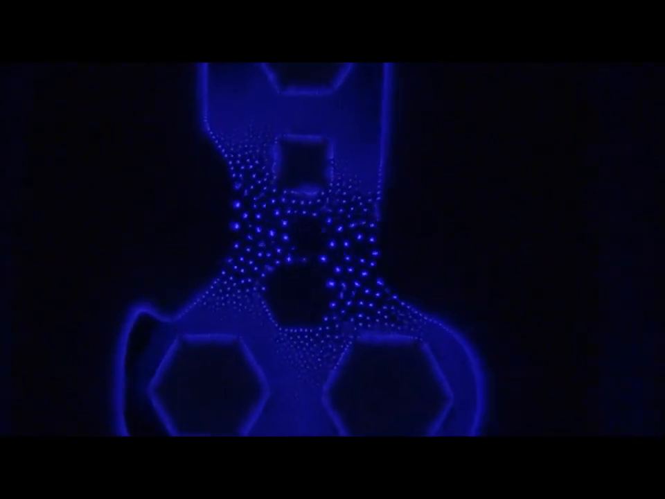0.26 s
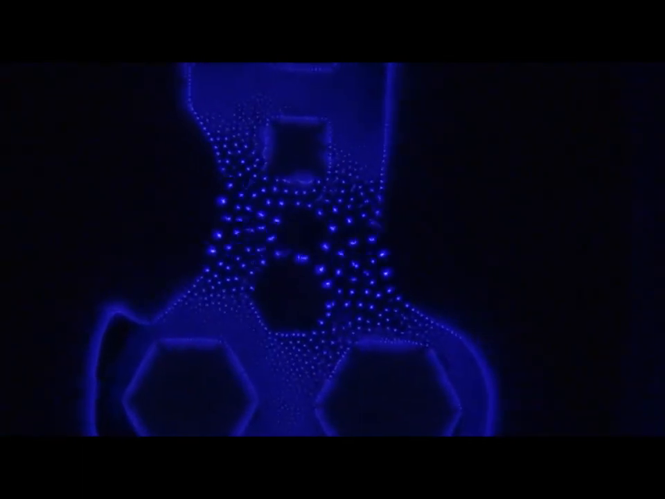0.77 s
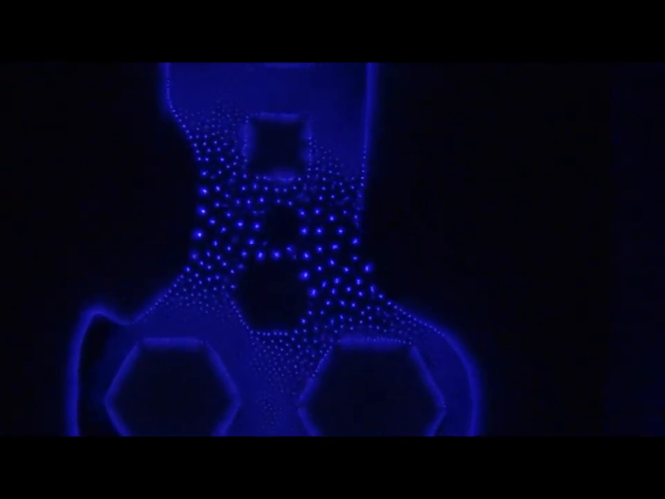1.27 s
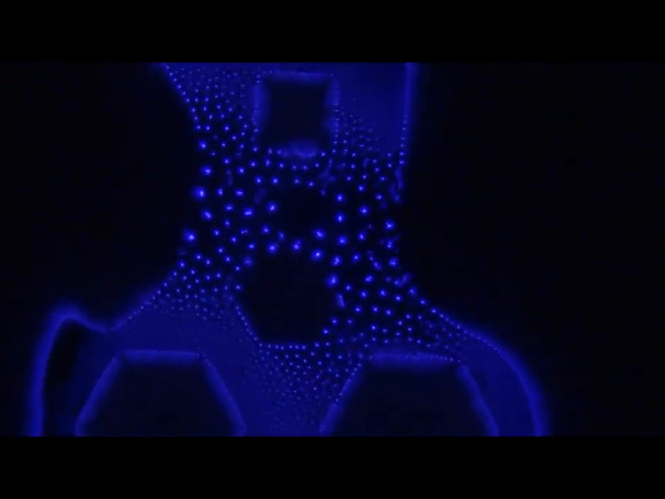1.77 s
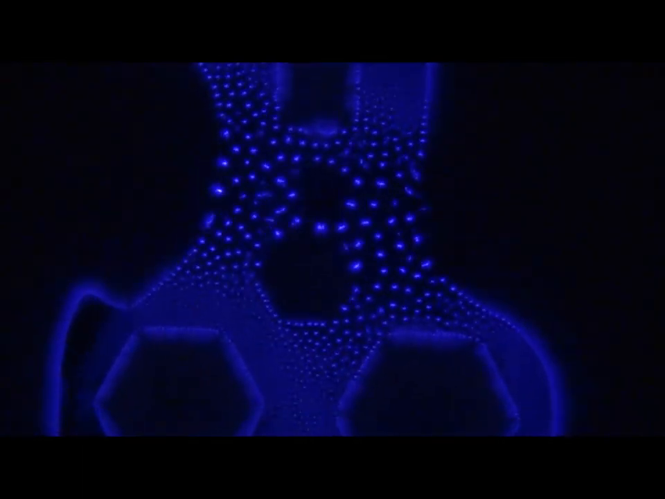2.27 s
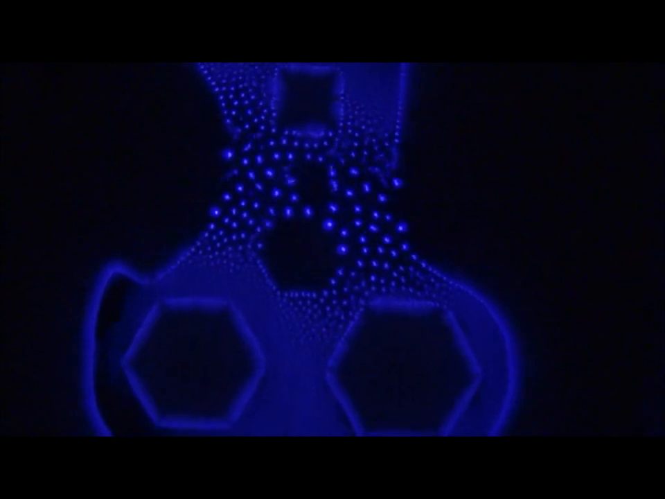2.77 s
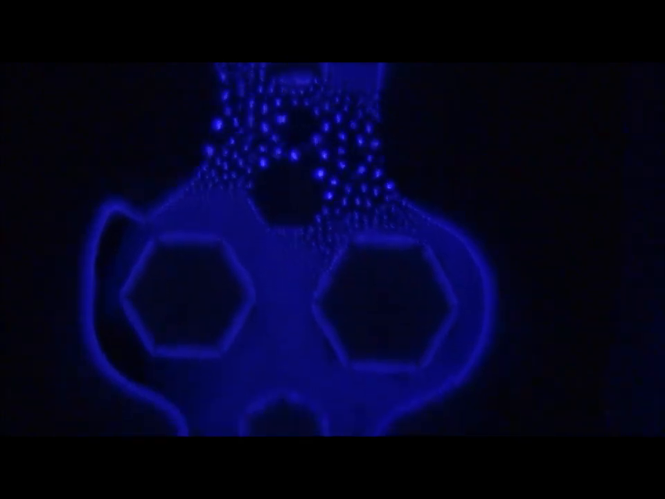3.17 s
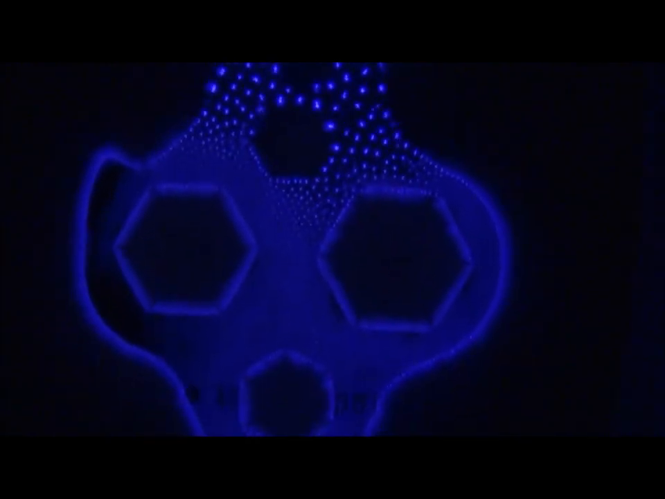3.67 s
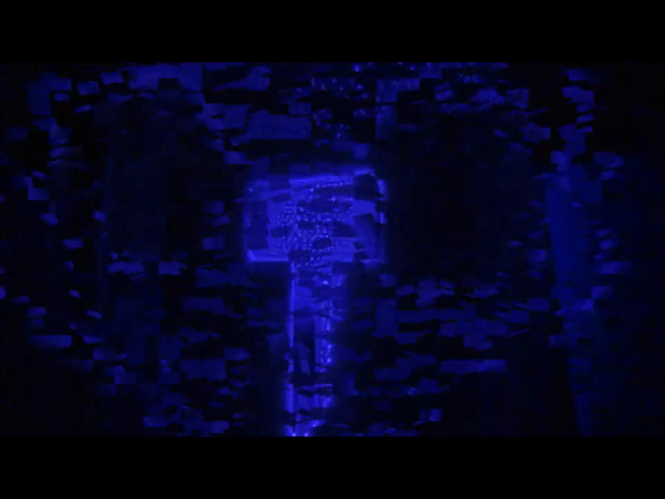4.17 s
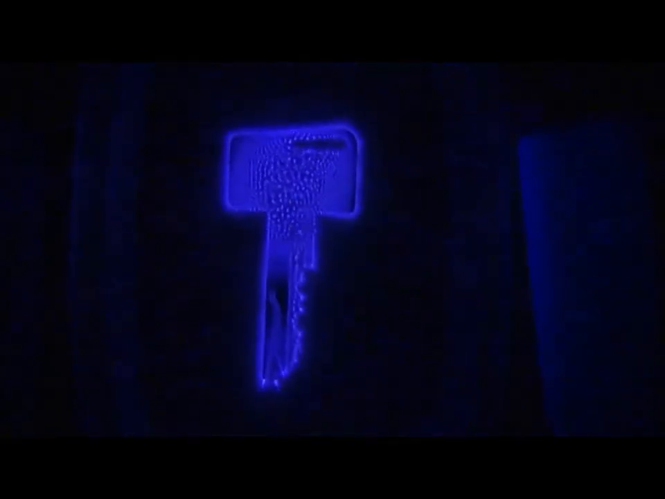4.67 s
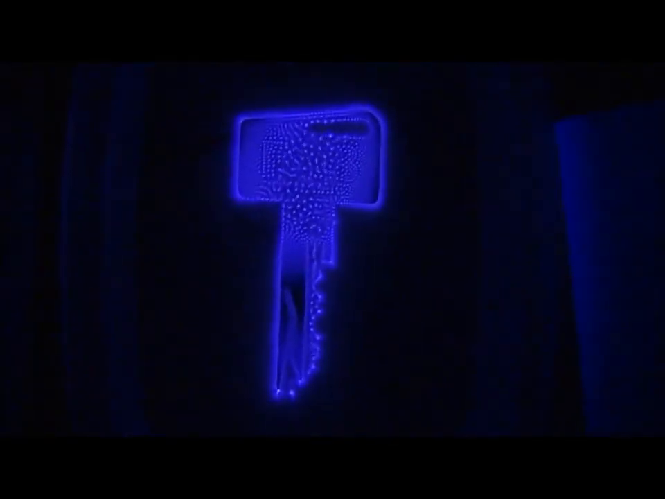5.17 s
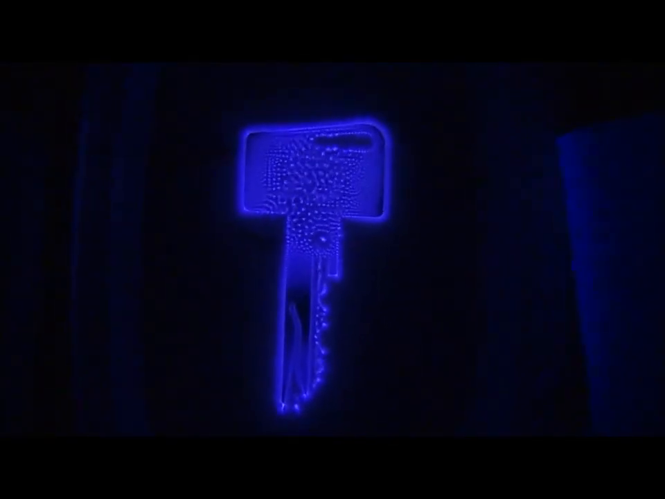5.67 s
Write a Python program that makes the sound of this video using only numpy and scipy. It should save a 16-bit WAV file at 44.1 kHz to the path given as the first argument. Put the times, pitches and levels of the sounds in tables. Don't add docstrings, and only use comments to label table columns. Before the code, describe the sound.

Dense, fizzing electrical hiss runs without pause, close and almost central, coloured by ringing metal and glass resonances and ending dully at the very top. Quiet low hum from a fan and motors sits under it. The recorder's housing clicks now and then. The hiss gradually shifts colour as the microphone slides along the wrench, then jumps in level and tone at two cuts to the key.

```python
import sys
import numpy as np
from scipy import signal
from scipy.fft import rfft, irfft, next_fast_len
from scipy.io import wavfile

SR = 44100
rng = np.random.default_rng(int(sys.argv[2]) if len(sys.argv) > 2 else 0)


def waveform_to_disk(signal):
    frames = np.transpose(np.atleast_2d(signal))
    scaled = np.clip(frames, -1, 1) * 32767
    samples = np.round(scaled).astype(np.int16)
    wavfile.write(sys.argv[1], SR, samples)


def rack_gain(trim_db):
    fader = np.asarray(trim_db, float)
    return 10 ** (fader / 20)


N = 260631

CUTS_S = [4.123, 4.897]
# sizzle_db, left_over_right_db, diffuse_db, diffuse_tilt_db_per_octave
CORONA = [
    (-31.6, -1.15, -14.8, 0),
    (-26.7, .35, -14.8, 1.6),
    (-28.5, 1.0, -15.2, 2.6),
]
# centre_hz, width_hz, level_db
WRENCH_HIGH_MODES = [(2440, 320, -1.5), (3110, 290, -5.5), (3330, 170, -6.5), (3750, 180, -4.0),
                     (4250, 290, -5.5), (4990, 290, -1.0), (5650, 330, -0.5), (6370, 240, -0.5),
                     (7050, 210, -2.0), (7700, 220, 1.5), (8370, 550, -2.5), (9200, 560, -3.0),
                     (9870, 350, -2.5), (10720, 360, -4.5)]
# centre_hz, width_hz, level_db
WRENCH_LOW_MODES = [(2430, 460, -1.0), (2960, 890, -4.5), (3280, 150, -4.0), (3670, 260, -10.0),
                    (4190, 230, -3.0), (4840, 200, -2.5), (5420, 310, 0.5), (6180, 310, -2.0),
                    (6810, 210, -2.5), (7490, 340, -1.0), (8300, 470, -3.5), (9010, 290, -2.0),
                    (9530, 490, -4.5), (10600, 900, -7.0)]
# centre_hz, width_hz, level_db
KEY_NEAR_MODES = [(2030, 900, -7.5), (2280, 460, 0.0), (2700, 570, -4.5), (3580, 230, -2.5),
                  (3690, 160, -1.5), (4180, 270, -4.5), (4880, 290, -3.0), (5440, 240, 0.0),
                  (6030, 300, -1.0), (6930, 450, -1.5), (7680, 360, 0.0), (8270, 330, 1.0),
                  (8980, 700, 0.0), (9950, 590, -1.0), (10690, 400, 0.0)]
# centre_hz, width_hz, level_db
KEY_FAR_MODES = [(1670, 900, -14.5), (2130, 460, -5.0), (2780, 900, -10.0), (3420, 260, -7.5),
                 (3620, 140, -5.5), (4100, 240, -6.0), (4840, 190, -1.5), (5020, 440, -3.5),
                 (6060, 640, -3.0), (6890, 250, -1.5), (7580, 420, -0.5), (8230, 280, 1.5),
                 (9030, 720, -0.5), (9910, 430, -1.5), (10510, 490, -0.5)]
# start_s, end_s
SLIDE_S = [2.45, 3.3]
# frequency_hz, level_db
ECHO_SPECTRUM = [(900, -16), (1600, -8), (2400, -1.5), (4300, -1), (4650, -3), (5200, 0), (6300, 0),
                 (6700, -2), (7200, 0), (11000, -1)]
# speed_at_cut_hz, gain_hz_per_s
FAN_SPEED = [(50.28, .575), (52.7, .26), (51.3, .4)]
FAN_DB = [-51.5, -53.5, -47]
# multiple_of_speed, level_db
FAN_ORDERS = [(2, -72), (3, -77), (5, -68), (7, -65)]
# speed_hz, level_db, cancel_s
TWIN_FAN = (51.1, -47.5, 4.56)
# pitch_hz, wrench_db, key_near_db, key_far_db
TONES = [(50.0, -80, -80, -60), (100, -76, -66, -67), (120, -60, -55, -58), (200, -75, -64, -67),
         (256.3, -85, -66, -80), (471.0, -74, -72, -73), (471.6, -68, -67, -68)]
# upper_hz, gap_hz, lower_share (ratio), swell_s
MOTOR_PAIR = (171.45, 2.38, .5, 2.04)
MOTOR_PAIR_DB = [-61, -61, -64]
HUM_PAN_DB = [-0.5, .3, -0.7]
# frequency_hz, density_db_per_hz
ROOM_SPECTRUM = [(15, -22), (30, -11), (60, -11.5), (90, -7.5), (160, -11), (225, -7), (300, -12),
                 (410, -11.5), (600, -16), (1050, -21), (1800, -36), (2500, -12.5), (5500, -29)]
ROOM_DB = [-53, -48.5, -51]
# frequency_hz, likeness (0 to 1)
LIKENESS = [(30, .99), (120, 0.66), (250, 0.64), (500, 0.068), (1000, 0.083), (2500, 0.2)]
# start_s, peak_db, body_hz, breadth (ratio), crack_over_body_db
SNAPS = [
    (.482, -32, 1350, 1.7, 13.5),
    (1.302, -28.5, 1650, 1.44, 4),
    (1.638, -33, 1600, 1.3, 7),
    (1.645, -31.5, 1600, 1.4, 5),
    (2.819, -39, 1700, 1.5, 7),
    (2.829, -32, 1700, 1.4, 3),
    (4.209, -37, 1700, 1.2, 9),
]
# start_s, peak_db, body_hz,
# breadth (ratio)
KNOCKS = [(.461, -46, 1500, 1.4), (1.183, -39, 1700, 1.2), (1.231, -45, 1600, 1.3), (1.411, -37, 1100, 2.0),
          (1.42, -42, 1200, 1.8), (1.444, -41, 460, 1.4), (1.442, -37, 1750, 1.3), (1.462, -40, 1200, 1.34),
          (2.093, -32, 1490, 1.44), (2.133, -28.5, 1050, 2.4), (2.364, -47, 500, 1.25),
          (2.376, -41, 800, 2.1), (2.397, -46, 900, 1.6), (2.41, -32.5, 1050, 1.74),
          (3.281, -33, 1500, 1.8), (3.307, -42, 800, 2.0), (4.14, -52.5, 470, 0.99),
          (5.209, -39, 816, 1.115), (5.213, -46, 330, 1.26), (5.226, -37, 650, 2.2),
          (5.449, -43, 1210, 1.1), (5.767, -41, 1200, 1.2)]


def viewpoint():
    return np.searchsorted(CUTS_S, np.arange(N) / SR)


def in_view(values):
    return np.array(values)[viewpoint()]


def rms_one(x):
    return x / np.sqrt(np.mean(x ** 2) + 1e-20)


def at_hz(points, hz):
    table_hz, values = np.array(points).T
    return np.interp(np.log(hz), np.log(table_hz), values)


def drift(rate_hz):
    step = 40
    pole = np.exp(-2 * np.pi * rate_hz * step / SR)
    noise = rng.standard_normal(N // step + 2002)
    slow = signal.lfilter([1], [1, -2 * pole, pole * pole], noise)[2000:]
    return np.interp(np.arange(N) / step, np.arange(len(slow)), rms_one(slow))


def filtered(x, response):
    size = next_fast_len(N)
    hz = np.maximum(np.arange(size // 2 + 1) * SR / size, 1)
    return irfft(rfft(x, size) * response(hz), size)[..., :N]


def resonances(modes):
    def response(hz):
        bank = 0
        for k, (centre_hz, width_hz, level_db) in enumerate(modes):
            detuning = (hz - centre_hz ** 2 / hz) / width_hz
            bank = bank + (-1) ** k * rack_gain(level_db) / (1 + 1j * detuning)
        low = 900 / hz
        return bank / (1 - np.sqrt(2) * 1j * low - low ** 2) * (hz < 11200)
    return response


def streamers(per_s, spread_db, throb_db):
    ripple_hz, ripple_turns = 100.04, .49
    turns = ripple_hz * np.arange(N) / SR - ripple_turns
    throb = throb_db * (1 + 0.1 * drift(2.1)) * np.cos(2 * np.pi * turns)
    sizes = rack_gain(spread_db * np.minimum(rng.exponential(1, N), 4)) * rng.choice([-1, 1], N)
    sparks = sizes * (rng.random(N) < per_s / SR)
    return sparks * rack_gain(throb + 0.1 * drift(5.4) + 0.4 * drift(39.0))


def diffuse_return(scattered, tilt_db):
    def response(hz):
        return rack_gain(at_hz(ECHO_SPECTRUM, hz) + tilt_db * np.log2(hz)) * (hz < 11200)
    return rms_one(filtered(scattered, response))


def corona():
    level_db, pan_db, diffuse_db, _ = in_view(CORONA).T
    sparks = streamers(per_s=26000.0, spread_db=1.9, throb_db=1.0)
    colours = [WRENCH_HIGH_MODES, WRENCH_LOW_MODES, KEY_NEAR_MODES, KEY_FAR_MODES]
    high, low, near, far = [rms_one(filtered(sparks, resonances(modes))) for modes in colours]

    slid = np.interp(np.arange(N) / SR, SLIDE_S, [0, 1])
    alike = np.mean(high * low)
    slide_rms = np.sqrt(1 - 2 * (1 - alike) * slid * (1 - slid))
    wrench = (high + slid * (low - high)) / slide_rms
    direct = np.choose(viewpoint(), [wrench, near, far])

    scattered = rng.standard_normal(N)
    returns = [diffuse_return(scattered, tilt_db) for *_, tilt_db in CORONA]
    diffuse = rack_gain(diffuse_db) * np.choose(viewpoint(), returns)
    sides = direct + diffuse * [[1], [-1]]
    return sides * rack_gain(level_db + pan_db * [[.5], [-.5]])


def fan():
    start_hz, gain_hz = in_view(FAN_SPEED).T
    since_cut_s = np.arange(N) / SR - in_view([0, *CUTS_S])
    turns = np.cumsum(start_hz + gain_hz * since_cut_s) / SR
    shaft = rack_gain(in_view(FAN_DB) + .5 * drift(2.7)) * np.sin(2 * np.pi * turns)

    blades = np.zeros(N)
    for order, level_db in FAN_ORDERS:
        phase_turns = order * turns + rng.random()
        blades += rack_gain(level_db + 1.8 * drift(4.0)) * np.sin(2 * np.pi * phase_turns)

    twin_hz, twin_db, cancel_s = TWIN_FAN
    twin_turns = twin_hz * (np.arange(N) / SR - cancel_s) + turns[round(cancel_s * SR)]
    twin = -rack_gain(twin_db) * np.sin(2 * np.pi * twin_turns) * (viewpoint() == 1)
    return np.sqrt(2) * (shaft + blades + twin)


def motors():
    t, out = np.arange(N) / SR, np.zeros(N)
    for pitch_hz, *levels_db in TONES:
        level_db = in_view(levels_db) + 1.0 * drift(2.4)
        turns = pitch_hz * t + .03 * drift(2.0) + rng.random()
        out += np.sqrt(2) * rack_gain(level_db) * np.sin(2 * np.pi * turns)
    return out


def motor_pair():
    upper_hz, gap_hz, lower_share, swell_s = MOTOR_PAIR
    t = np.arange(N) / SR - swell_s
    upper = np.cos(2 * np.pi * upper_hz * t)
    lower = lower_share * np.cos(2 * np.pi * (upper_hz - gap_hz) * t)
    return np.sqrt(2) * rack_gain(in_view(MOTOR_PAIR_DB)) * (upper + lower)


def room_air():
    def part(sign):
        def response(hz):
            alike = np.clip(at_hz(LIKENESS, hz), 0, 1)
            return rack_gain(at_hz(ROOM_SPECTRUM, hz)) * np.sqrt(1 + sign * alike)
        return filtered(rng.standard_normal(N), response)
    mid, side = part(1), part(-1)
    return rack_gain(in_view(ROOM_DB) + 0.32 * drift(6.9)) * rms_one(mid + side * [[1], [-1]])


def ticks():
    rattle_s, ring_cycles = 0.023, 12
    knock_crack_db = 2.5
    out, t = np.zeros((2, N)), np.arange(round(.14 * SR)) / SR
    rows = SNAPS + [(*row, knock_crack_db) for row in KNOCKS]
    noise = rng.standard_normal((len(rows), 3, len(t)))
    impulse = 20 * (np.arange(len(t)) == 30)
    crack_band = signal.butter(2, [1900, 4300], "band", fs=SR, output="sos")
    for (start_s, peak_db, body_hz, breadth, crack_db), rattle in zip(rows, noise):
        breadth = max(breadth, 1.02)
        t60 = rattle_s + ring_cycles / (body_hz * (breadth - 1 / breadth))
        rattle = rattle * rack_gain(-60 * t / t60) * np.minimum(t / 0.0015, 1)
        knock = rattle[0] + .35 * rattle[1:] + impulse
        body_edges_hz = [body_hz / breadth, body_hz * breadth]
        body_band = signal.butter(3, body_edges_hz, "band", fs=SR, output="sos")
        body = signal.sosfilt(body_band, knock)
        crack = signal.sosfilt(crack_band, rattle[1:] + 0.089 * knock)
        tick = body / np.abs(body).max() + rack_gain(crack_db) * crack / np.abs(crack).max()
        at = round(start_s * SR)
        out[:, at:at + len(t)] += rack_gain(peak_db) * tick
    return out


def scene():
    hum = (fan() + motors() + motor_pair()) * rack_gain(in_view(HUM_PAN_DB) * [[.5], [-.5]])
    return corona() + hum + room_air() + ticks()


def wall(hz):
    return rack_gain(-np.clip((hz - 11000) * .42, 0, 70))


def roll_off(x):
    return signal.sosfilt(signal.butter(12, 12310, fs=SR, output="sos"), x)


def record(dry):
    mix = filtered(dry, wall)
    return roll_off(mix)


dry = scene()
out = record(dry)
waveform_to_disk(out)
```